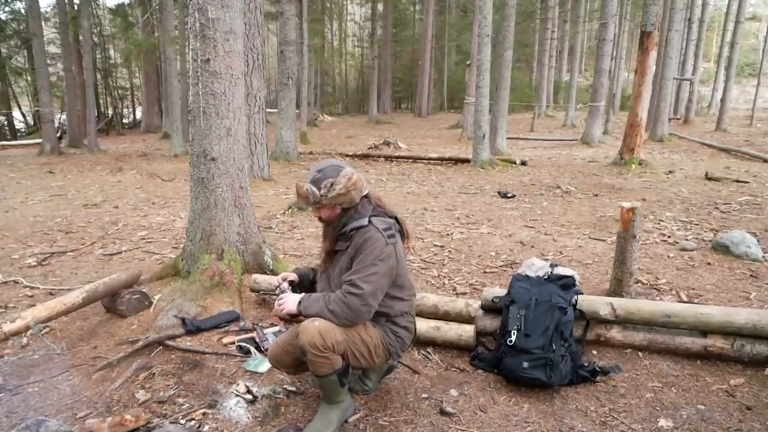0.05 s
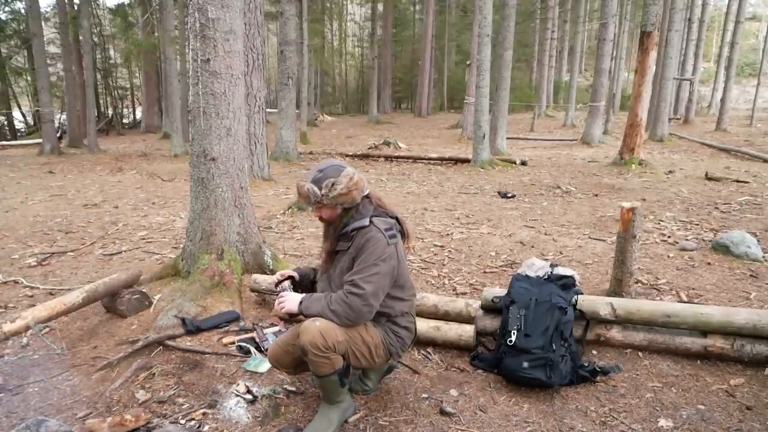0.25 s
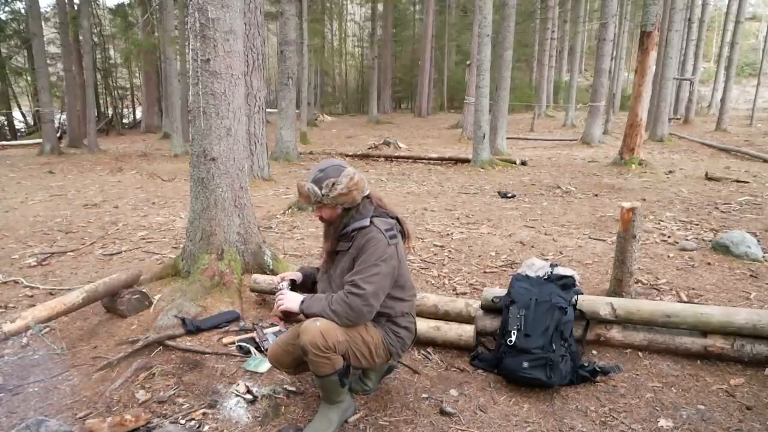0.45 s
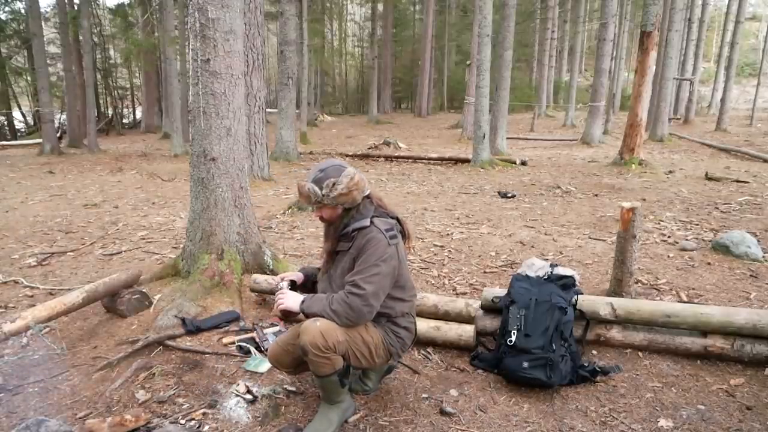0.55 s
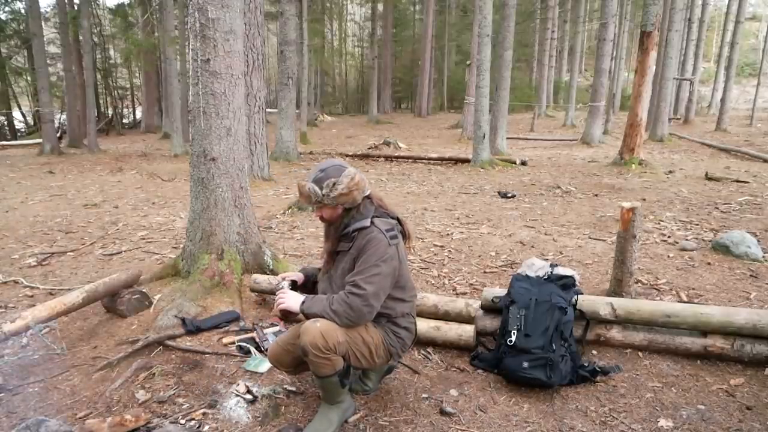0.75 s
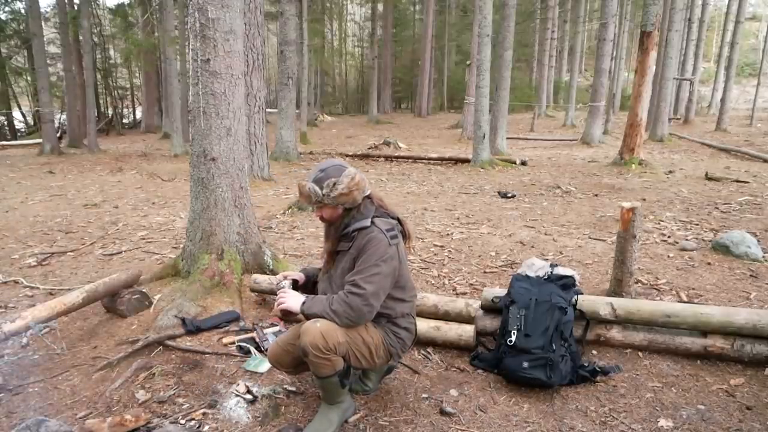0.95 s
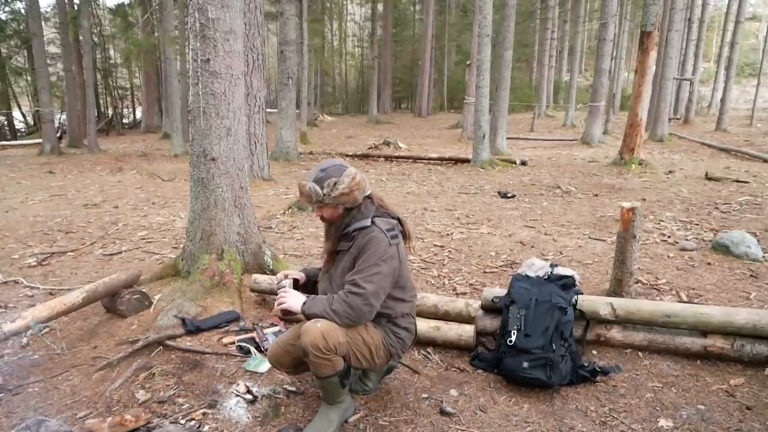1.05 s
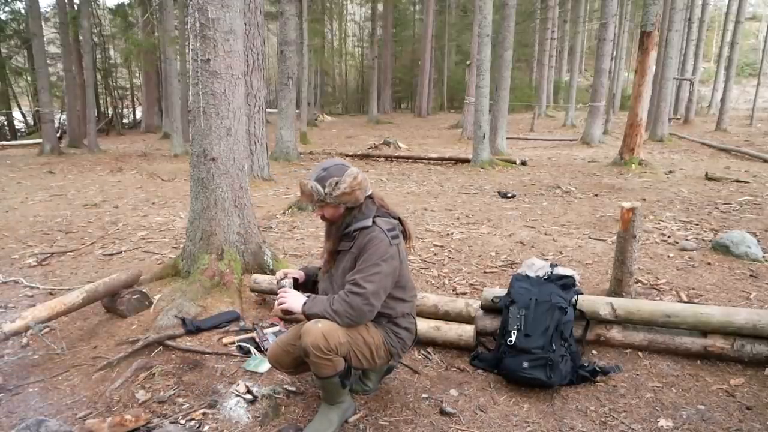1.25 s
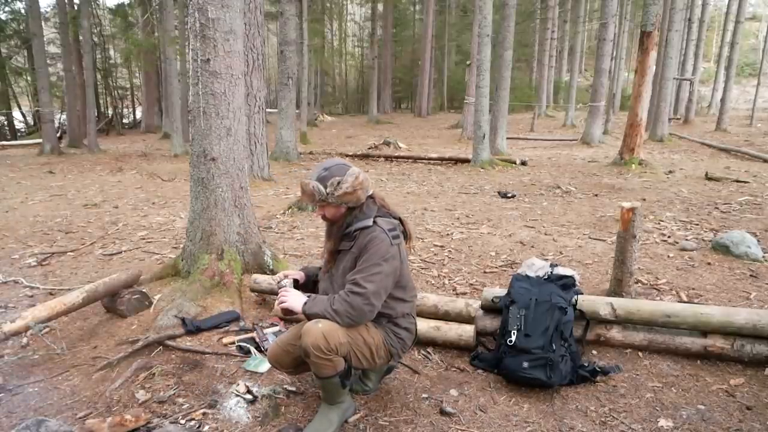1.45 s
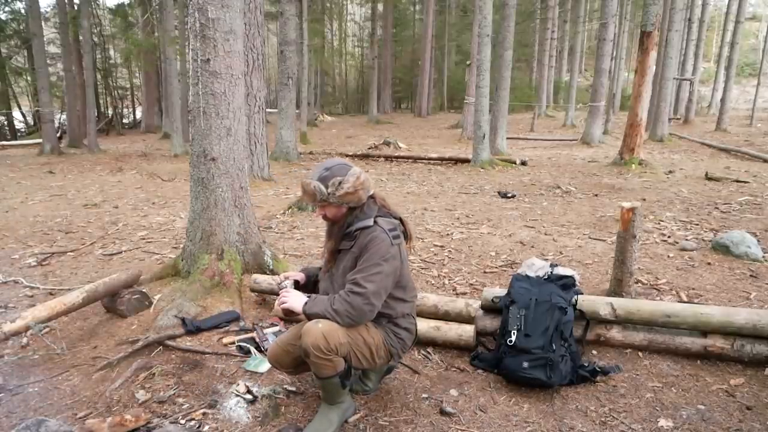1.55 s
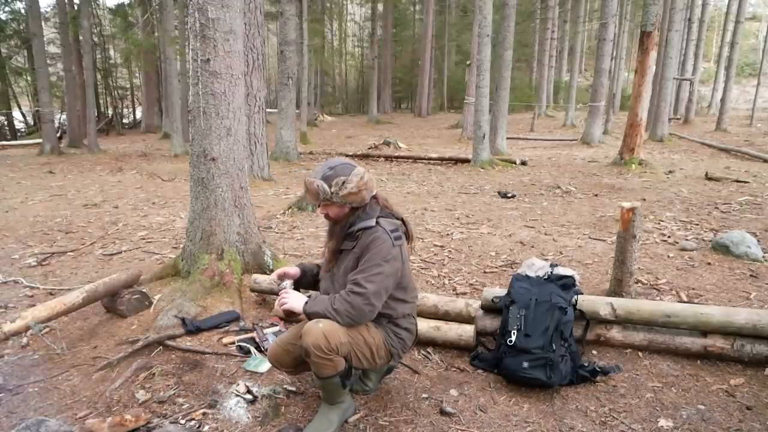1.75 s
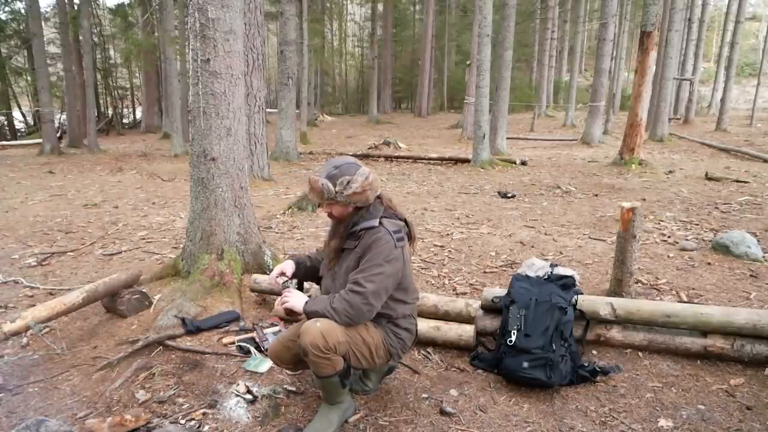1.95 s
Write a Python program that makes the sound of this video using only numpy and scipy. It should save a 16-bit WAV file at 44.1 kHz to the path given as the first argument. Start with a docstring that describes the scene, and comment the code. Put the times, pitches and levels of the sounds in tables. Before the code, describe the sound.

Handled metal cookware gives short ringing clinks and hollow pot knocks, then after a lull gritty lid scrapes and low thuds. Soft sleeve rustle and very quiet outdoor air with faint low hum, centred and close.

```python
"""Metal cookware in a quiet forest

Small pots scrape and clink, enclosed air knocks hollowly, then a lid goes on in rasping shoves with dull thumps.
Clinks are decaying wall modes, knocks gliding sines, scrapes and ticks filtered grit under timed envelopes.
Sleeve rustle and air are coloured noise over a faint sine hum; a dull noise-tail echo follows the ware.
The sound is all but mono."""
import sys
import numpy as np
from scipy import signal
from scipy.fft import rfft, irfft
from scipy.io import wavfile

SR = 44100
rng = np.random.default_rng(int(sys.argv[2]) if len(sys.argv) > 2 else 0)


def digitize_waveform(pressure):
    """Quantize a signal to 16-bit integers and store it at the path in sys.argv[1].

    Rows of a 2-D input are taken as channels; values are limited to [-1, 1].
    """
    field = np.atleast_2d(pressure).T
    bounded = np.clip(field, -1, 1)
    quanta = np.round(bounded * 32767).astype(np.int16)
    wavfile.write(sys.argv[1], SR, quanta)


N = 88200
T = np.arange(N) / SR


def amp(db):
    """Decibels to gain."""
    return 10 ** (np.asarray(db) / 20)


def unit(x):
    """Scale to rms 1."""
    return x / np.sqrt(np.mean(x ** 2))


def band(x, hz, kind, order=2):
    """Butterworth filter."""
    return signal.sosfilt(signal.butter(order, hz, kind, fs=SR, output="sos"), x)


def fade(age_s, t60_s):
    """Exponential decay, 60 dB in t60_s."""
    return np.exp(-np.log(1000) * age_s / t60_s)


def coloured(x, points):
    """Weight the spectrum of x by (Hz, dB) points, joined over log frequency, to rms 1."""
    hz, db = np.array(points).T
    bin_hz = np.fft.rfftfreq(N, 1 / SR)
    gain = amp(np.interp(np.log(bin_hz + 1), np.log(hz), db))
    return unit(irfft(rfft(x) * gain, N))


def walk(rate_hz):
    """Random fluctuation of rms 1: noise that falls steeply above rate_hz."""
    return coloured(rng.standard_normal(N), [(rate_hz, 0), (2 * rate_hz, -100)])


def grit():
    """Micro-collisions of sliding surfaces: dense uneven clicks over smooth noise."""
    grains_per_s, spread_db, smooth_share = 3500, 1, 0.46
    hits = rng.random(N) < grains_per_s / SR
    signs = rng.choice([-1, 1], N)
    clicks = hits * signs * amp(spread_db * rng.standard_normal(N))
    return unit(clicks) + smooth_share * rng.standard_normal(N)


def forest_air():
    """Still air as steady coloured noise."""
    level_db = -58
    # spectrum: (frequency [Hz], density [dB])
    air_colour = [(15, -66), (25, -7), (108, 2.5), (149, -16), (206, 0.5), (416, -8.5), (900, -57.5),
                  (8590, -31), (16000, -34)]
    return amp(level_db) * coloured(rng.standard_normal(N), air_colour)


def hum():
    """Faint low sine lines, each wavering in level."""
    waver_db, waver_hz = 1.4, 7.4
    # lines: (frequency [Hz], rms level [dB])
    hum_lines = [(99.7, -60), (200, -82), (400, -75)]
    out = np.zeros(N)
    for hz, db in hum_lines:
        level = np.sqrt(2) * amp(db + waver_db * walk(waver_hz))
        out += level * np.sin(2 * np.pi * (hz * T + rng.random()))
    return out


def forest_echo(x):
    """Tree trunks scatter a thin, dull echo: x convolved with a decaying noise tail."""
    level_db, t60_s, dull_hz, onset_s = -45, 0.15, 3230, 0.025
    tail = band(rng.standard_normal(N), dull_hz, "low", order=1)
    tail = tail * fade(T, t60_s) * np.minimum(T / onset_s, 1)
    return amp(level_db) * signal.fftconvolve(x, tail / np.linalg.norm(tail))[:N]


def sleeves():
    """Cloth rubs softly as the arms move: coloured grit under a flickering level."""
    flicker_db, flicker_hz = 1.5, 29.5
    # level curve: (time [s], level [dB])
    rustle_level = [(0, -56), (.13, -61), (.68, -64.5), (.97, -64.5), (1.04, -65), (1.29, -71.5),
                    (1.45, -63.5), (1.56, -65.5), (1.8, -61.5), (2, -56.5)]
    # spectrum: (frequency [Hz], density [dB])
    rustle_colour = [(290, -29), (500, 1.5), (2130, -5.5), (9920, -11), (16000, -22.5)]
    time_s, db = np.array(rustle_level).T
    level_db = np.interp(T, time_s, db) + flicker_db * walk(flicker_hz)
    return coloured(grit(), rustle_colour) * amp(level_db)


def ticks():
    """Hard rim contacts: bands of grit that start sharply and die at once."""
    t60_s, width_ratio = 0.017, 1.7
    # contacts: (time [s], level [dB], centre [Hz])
    tick_events = [(.146, -39.5, 6000), (0.186, -33, 6800), (0.2125, -26, 8500), (0.2404, -28.5, 3770),
                   (0.5208, -34.5, 4260), (1.0664, -32.5, 5940), (1.105, -22.5, 1420), (1.1995, -27, 4260),
                   (1.319, -42, 5900), (1.3345, -35.5, 5800), (1.419, -52, 5500), (1.4424, -46, 6000),
                   (1.466, -43.5, 6940), (1.4887, -34, 7500), (1.723, -44.5, 7000)]
    out, rub = np.zeros(N), grit()
    for s, db, hz in tick_events:
        crack = unit(band(rub, [hz / width_ratio, hz * width_ratio], "band"))
        out += amp(db) * (T >= s) * fade(np.abs(T - s), t60_s) * crack
    return out


def shimmer(x):
    """The thin wall's many weak modes ring on briefly after every grain: a short noise tail."""
    level_db, t60_s = -6, 0.04
    age_s = T[:SR // 10]
    ring = rng.standard_normal(len(age_s)) * fade(age_s, t60_s)
    return x + amp(level_db) * signal.fftconvolve(x, ring / np.linalg.norm(ring))[:N]


def gripped_wall(rub, body, dull_hz):
    """Grit excites damped wall resonances; some contact noise bypasses them."""
    crackle_db = -10
    width_hz, width_share = 81, 0.002  # bandwidth = width_hz + share of the pitch
    wall = amp(crackle_db) * rub
    for hz, db in body:
        b, a = signal.iirpeak(hz, hz / (width_hz + width_share * hz), fs=SR)
        wall = wall + amp(db) * signal.lfilter(b, a, rub)
    return band(wall, dull_hz, "low", order=1)


def scrapes(events, body, dull_hz):
    """Friction swells to a stop and dies away in three bands; the surfaces catch and slip."""
    thud_hz, thud_db = 117, -17.5  # weight of the hands, relative to the bass band
    judder_db, judder_hz = 1.4, 400
    # edges of the bass, middle and treble bands [Hz]
    band_edges_hz = [170, 560, 2250, 16000]
    wall = gripped_wall(grit(), body, dull_hz)
    edge_pairs = zip(band_edges_hz, band_edges_hz[1:])
    bands = np.array([unit(band(wall, edges, "band", order=3)) for edges in edge_pairs])
    bands[0] += amp(thud_db) * unit(band(rng.standard_normal(N), thud_hz, "low"))
    force = []
    for s, rise_s, t60_s, *_ in events:
        rise = np.exp(np.minimum(T - s, 0) / rise_s)
        force.append(rise * fade(np.maximum(T - s, 0), t60_s))
    event_gain = amp([row[3:] for row in events])
    power = event_gain.T ** 2 @ np.array(force) ** 2  # overlapping events add in power
    judder = unit(amp(judder_db * walk(judder_hz)))
    return shimmer(np.sum(bands * np.sqrt(power), axis=0) * judder)


def lid_shoves():
    """The lid rasps on in a few shoves through its own wall resonances."""
    # shoves: (peak [s], rise constant [s], t60 [s], bass [dB], middle [dB], treble [dB])
    lid_events = [(1.047, 0.016, 0.96, -57.5, -54, -56.5), (1.0665, 0.00055, 0.025, -41, -30, -30.5),
                  (1.1055, 0.0019, 0.057, -38, -28.5, -28.5), (1.171, 0.011, 0.092, -47.5, -38, -40.5),
                  (1.196, 0.002, 0.031, -27.5, -27.5, -45), (1.2015, 0.0081, 0.052, -29.5, -25.5, -31),
                  (1.3295, 0.0016, 0.025, -43, -35, -38), (1.3345, 0.0018, 0.039, -27.5, -30.5, -29.5),
                  (1.3445, 0.00085, 0.058, -56, -33, -34.5), (1.361, 0.005, 0.055, -38.5, -36, -38.5),
                  (1.497, 0.015, 0.068, -56.5, -49, -45), (1.733, 0.011, 0.14, -57, -50.5, -51.5)]
    # wall resonances: (frequency [Hz], level [dB])
    lid_body = [(700, -9), (980, -9.5), (1290, 1), (1640, 3.5), (1880, -15), (3480, 1), (3840, -11),
                (4600, -2), (5200, -2), (8400, -0.5), (11000, -4)]
    return scrapes(lid_events, lid_body, dull_hz=8800)


def pot_scrapes():
    """The pot scrapes on its mate through its own wall resonances."""
    # scrapes: (peak [s], rise constant [s], t60 [s], bass [dB], middle [dB], treble [dB])
    pot_events = [(.0765, 0.00045, 0.06, -45.5, -45.5, -78), (.188, 0.0012, 0.12, -62, -51, -49),
                  (.2085, 0.0091, 0.063, -31.5, -35.5, -31), (.2135, 0.0006, 0.12, -27.5, -42, -29.5),
                  (.2385, 0.0043, 0.1, -28.5, -24.5, -31), (.288, 0.0017, 0.037, -38, -53, -33.5),
                  (.315, 0.003, 0.064, -37, -48, -34.5), (.329, 0.0048, 0.068, -42, -40.5, -42),
                  (.357, 0.0092, 0.046, -35, -40.5, -61), (.3695, 0.0013, 0.045, -42, -52, -44.5),
                  (.4505, 0.002, 0.038, -40.5, -34, -53), (.477, 0.033, 0.18, -50, -57.5, -51),
                  (.5205, 0.001, 0.045, -34.5, -29, -50), (.528, 0.002, 0.072, -30.5, -34, -51),
                  (.552, 0.0036, 0.053, -52, -43, -43.5), (.592, 0.049, 0.089, -48, -49, -51)]
    # wall resonances: (frequency [Hz], level [dB])
    pot_body = [(1000, -3.5), (1260, 3.5), (2030, 3.5), (2430, 2), (3500, 9), (4220, 6.5), (5080, 8),
                (7700, 3.5), (8190, 8.5), (11170, 9)]
    return scrapes(pot_events, pot_body, dull_hz=5200)


def knocks():
    """Enclosed air rings at a pitch sliding to the next knock's as the opening changes; chatter breaks it up."""
    glide_s, chatter_db, chatter_hz = 0.09, 1.75, 74
    # knocks: (time [s], starting pitch [Hz], level [dB], push time constant [s], t60 [s])
    knock_events = [(0.0753, 675, -20.5, 0.00041, 0.014), (0.079, 262, -33.5, 0.00091, 0.049),
                    (0.2114, 338, -16.5, 0.0017, 0.027), (0.2366, 320, -12.5, 0.00075, 0.037),
                    (0.249, 436, -7, 0.0058, 0.075), (0.3254, 459.5, -27.5, 0.0011, 0.12),
                    (0.358, 467, -27, 0.0039, 0.07), (0.3687, 454, -26.5, 0.00052, 0.12),
                    (0.4478, 434, -20, 0.001, 0.15), (0.5205, 356, -9.5, 0.0016, 0.03),
                    (0.546, 358.5, -29, 0.00085, 0.09), (0.585, 346, -33, 0.0031, 0.12),
                    (.649, 327, -32, 0.00072, 0.045), (0.833, 336, -41.5, 0.00077, 0.058),
                    (1.103, 295, -22.5, 0.0044, 0.054), (1.168, 304, -29.5, 0.0026, 0.12),
                    (1.1946, 286, -21.5, 0.00075, 0.055), (1.1999, 233.6, -11, 0.002, 0.042),
                    (1.342, 269, -21, 0.00043, 0.027), (1.36, 242, -12.5, 0.0018, 0.035)]
    out = np.zeros(N)
    age_s = T[:SR // 2]
    following = knock_events[1:] + knock_events[-1:]
    for (s, hz, db, push_s, t60_s), (_, next_hz, *_) in zip(knock_events, following):
        start = int(s * SR)
        pitch_hz = next_hz + (hz - next_hz) * np.exp(-age_s / glide_s)
        tone = np.sin(2 * np.pi * np.cumsum(pitch_hz) / SR)
        envelope = (1 - np.exp(-age_s / push_s)) * fade(age_s, t60_s)
        out[start:start + len(age_s)] += amp(db) * envelope * tone
    return out * amp(chatter_db * walk(chatter_hz))


def clinks():
    """Each touch rings the pot's modes as beating pairs; contact place favours some, grip scales the ring."""
    split_low_hz, split_high_hz, twin_share = 13, 26.91, 0.3
    # wall modes: (frequency [Hz], level [dB], t60 before the grip [s])
    pot_modes = [(1501, -1, .26), (2020, -1, .08), (2577, -6, .22), (2943, -7, .2), (3330, -6, .33),
                 (3560, -8, .1), (3847, -5, .13), (4205, -7, .1), (5100, -2, .075), (5541, -10, .38),
                 (7720, 2, .11), (8164, -3, .29), (11125, -13, .12)]
    # clinks: (time [s], level [dB], favoured pitch [Hz], spread [octaves], ring length share left by the grip)
    clink_events = [(0.001, -37.5, 2806, 0.13, 1.07), (.2072, -27, 2160, 0.55, 0.66),
                    (0.2192, -16, 2187, 0.23, 0.56), (.221, -33.5, 7700, 0.88, 1.42),
                    (0.243, -33, 6040, 0.65, 0.5), (.246, -37, 1450, 0.63, 1.9),
                    (.288, -27, 7590, 0.06, 0.55), (.314, -35.5, 5900, 0.9, 1.15),
                    (.369, -28, 1800, 0.28, 0.63), (.381, -44.5, 3180, 0.77, 0.79),
                    (.468, -40.5, 2260, 0.97, 0.69), (1.068, -30, 3550, 0.099, 0.63),
                    (1.204, -32.5, 1500, 0.21, 0.46), (1.205, -26, 3980, .1, 0.63),
                    (1.208, -35.5, 2590, 0.18, 0.8), (1.732, -47, 3290, 0.076, 0.32),
                    (1.763, -52, 5960, 0.54, 0.35)]
    out = np.zeros(N)
    for s, db, centre_hz, spread_oct, grip in clink_events:
        start = int(s * SR)
        age_s = T[:min(SR // 2, N - start)]
        for hz, mode_db, t60_s in pot_modes:
            favour = 1 / (1 + (np.log2(hz / centre_hz) / spread_oct) ** 2) ** 2
            twin_hz = hz + rng.uniform(split_low_hz, split_high_hz)
            pair = np.sin(2 * np.pi * hz * age_s) + twin_share * np.sin(2 * np.pi * twin_hz * age_s)
            ring = favour * fade(age_s, t60_s * grip) * pair
            out[start:start + len(age_s)] += amp(db + mode_db) * ring
    return out


def scene():
    """Cookware, sleeves and forest, centred; a faint phase-shifted copy gives a trace of width."""
    side_db = -43
    ware = clinks() + knocks() + ticks() + pot_scrapes() + lid_shoves()
    mid = ware + forest_echo(ware) + sleeves() + hum() + forest_air()
    side = amp(side_db) * signal.hilbert(mid).imag
    return np.array([mid + side, mid - side])


def record(dry):
    """The recorder cuts the top with a steep elliptic low-pass."""
    top_hz, ripple_db, stop_db = 15600, 0.2, 70
    return signal.sosfilt(signal.ellip(8, ripple_db, stop_db, top_hz, fs=SR, output="sos"), dry)


dry = scene()
out = record(dry)
digitize_waveform(out)
```